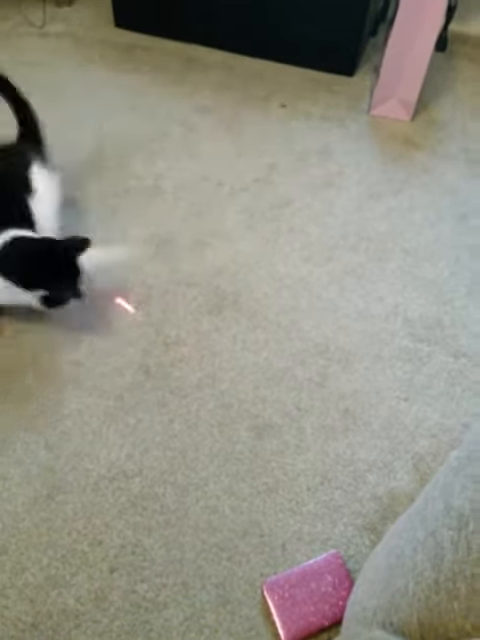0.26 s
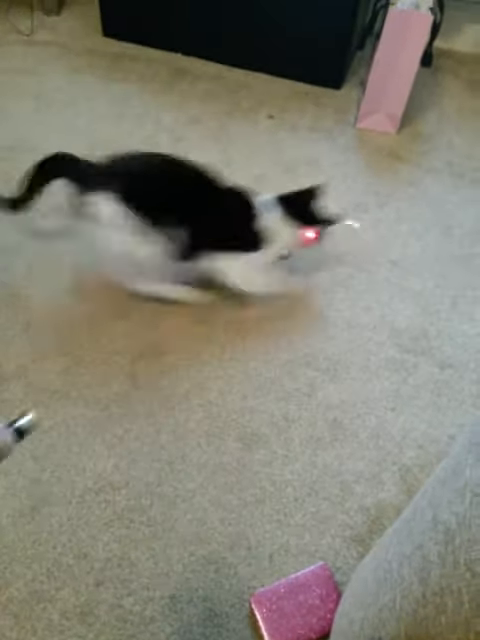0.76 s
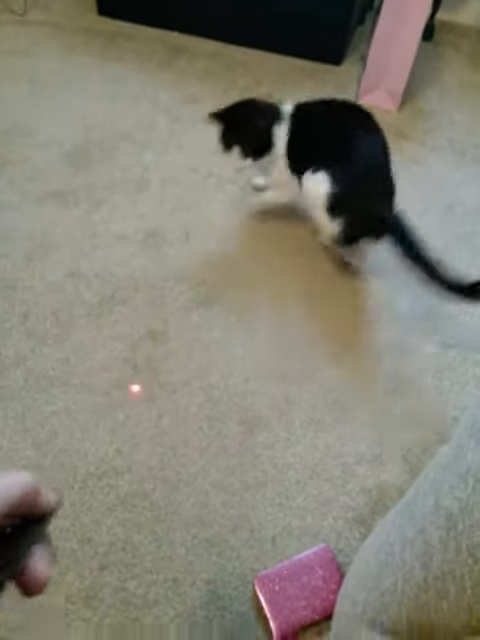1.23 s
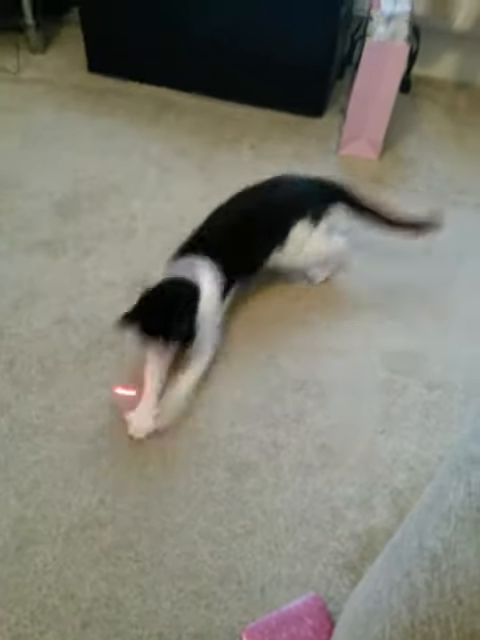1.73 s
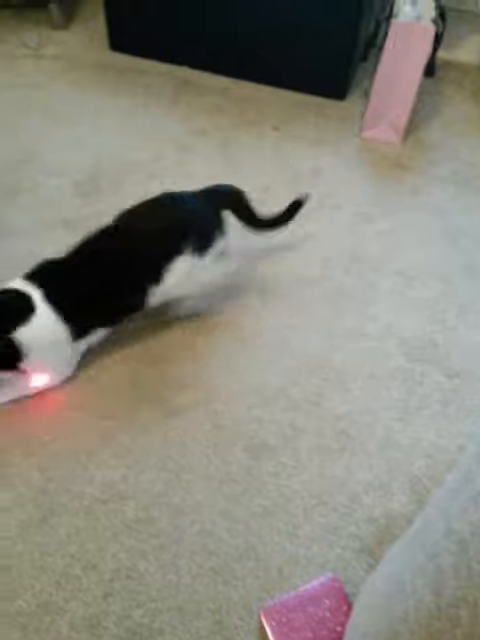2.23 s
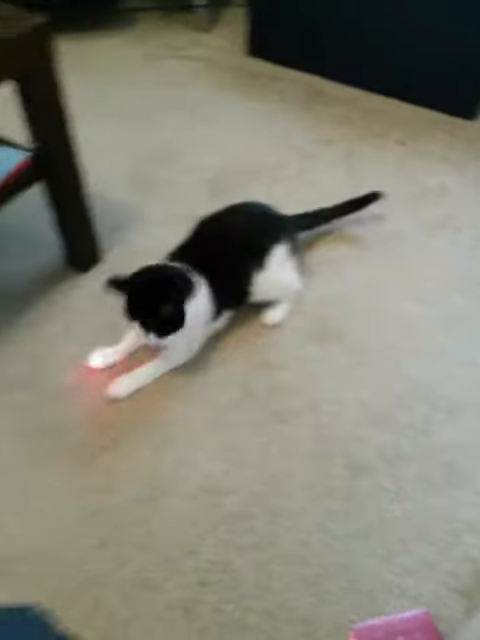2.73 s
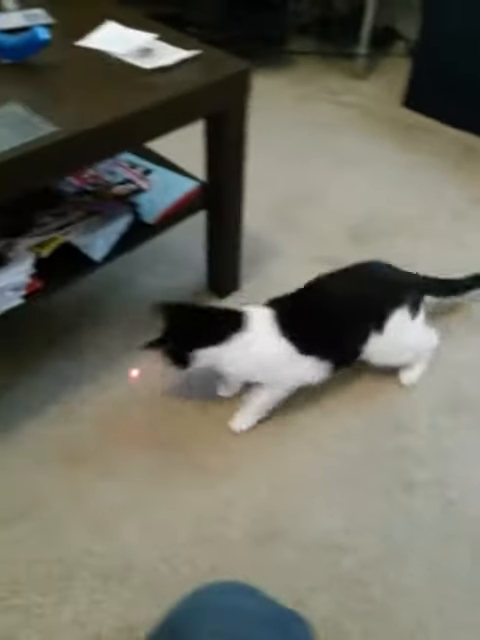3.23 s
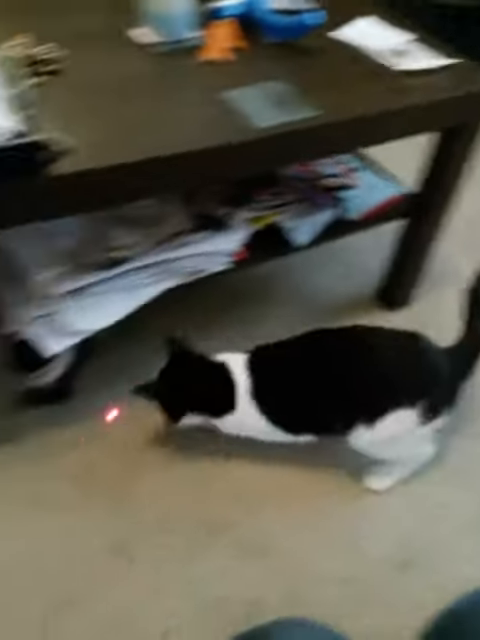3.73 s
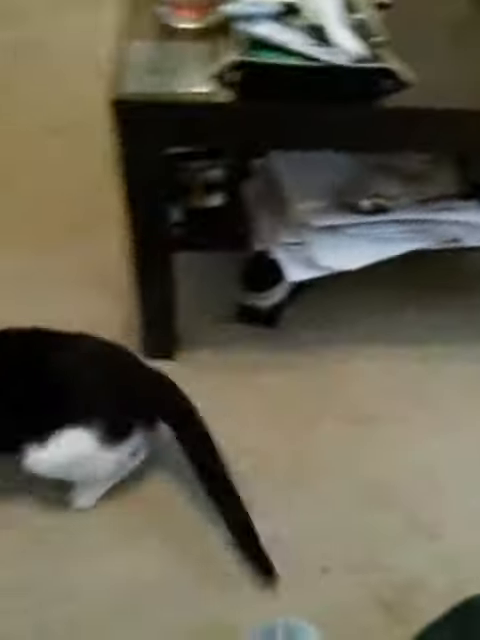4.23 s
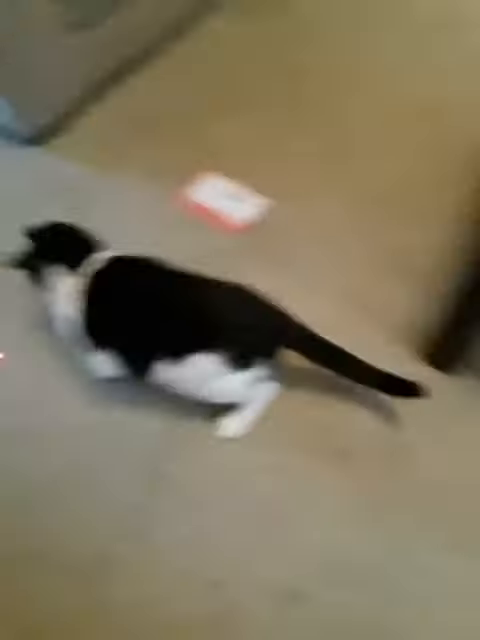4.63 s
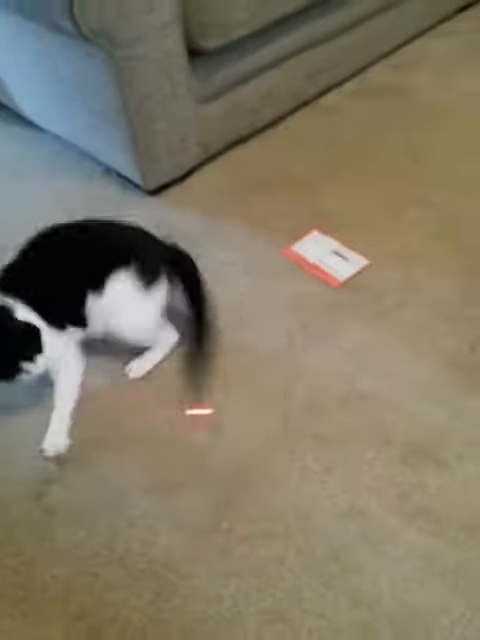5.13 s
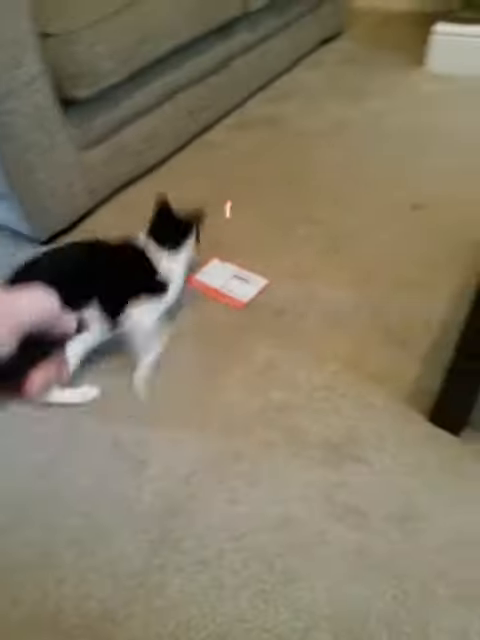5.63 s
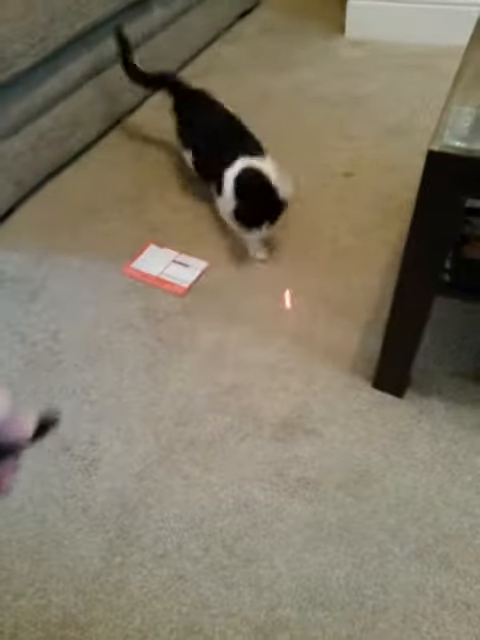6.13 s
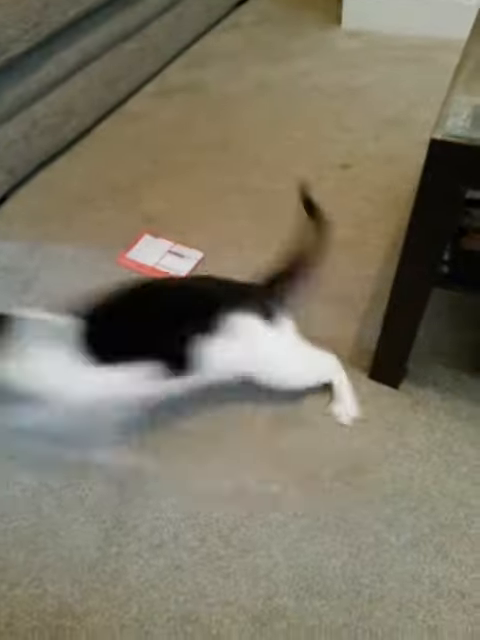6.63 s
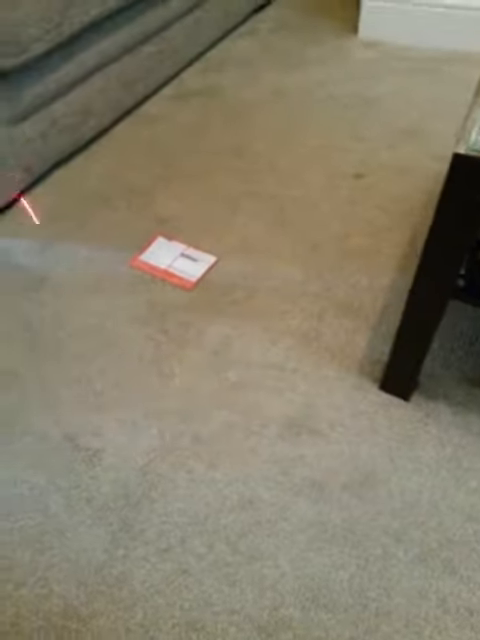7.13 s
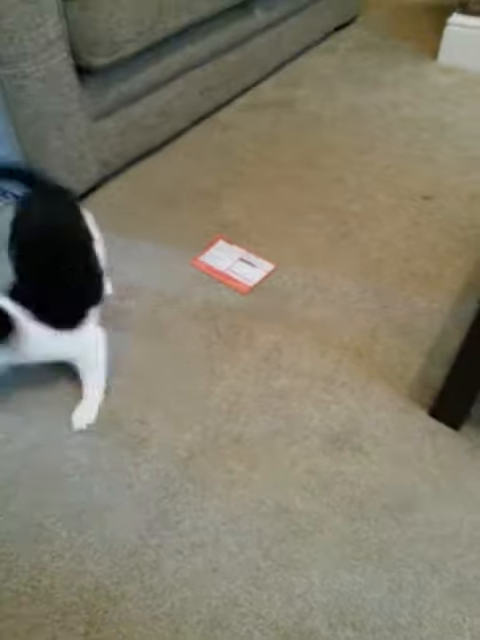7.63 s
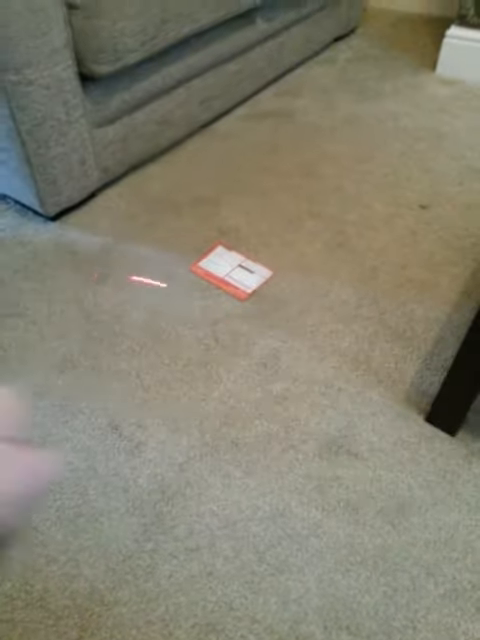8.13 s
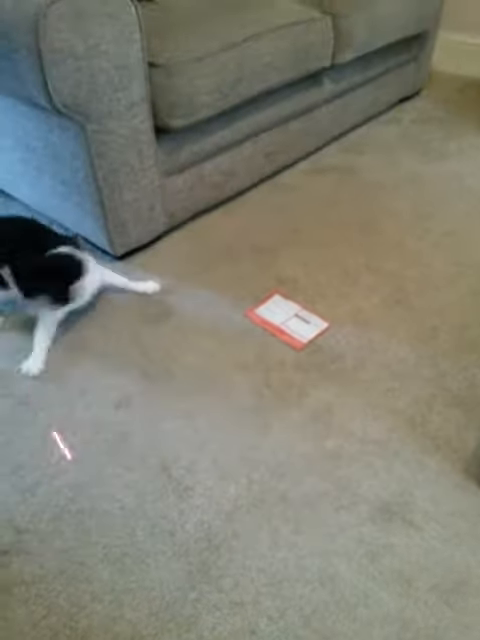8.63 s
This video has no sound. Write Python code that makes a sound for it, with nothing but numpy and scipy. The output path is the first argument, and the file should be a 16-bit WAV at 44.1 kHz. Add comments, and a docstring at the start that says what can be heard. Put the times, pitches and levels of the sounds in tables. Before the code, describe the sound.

A cat scampers, skids and pounces on living-room carpet, claws popping from the pile, while a hand hisses and a small metal chain clinks close on the left.

```python
"""A cat chases a laser dot over living-room carpet while a hand slides with a soft hiss close to the left.
First come paw steps, skids and faint hiss; near 2 s paws thump louder and claws pop out of the pile.
From 2.5 s the hand hisses louder, and near 4 s the pointer's small metal chain clinks in a dense burst.
After 5.5 s paws, pops and skids crowd together to the end. Still air and a short room echo lie behind.
Thuds are pushes of air, pops are filtered kicks, skids and hiss are shaped noise, clinks ring resonances."""
import sys
import numpy as np
from scipy import signal
from scipy.fft import rfft, irfft, next_fast_len
from scipy.io import wavfile
from scipy.ndimage import uniform_filter1d

SR = 44100
rng = np.random.default_rng(int(sys.argv[2]) if len(sys.argv) > 2 else 0)


def file_out(sig):
    """Save sig as 16-bit WAV at sys.argv[1]."""
    # one column per channel
    cols = np.atleast_2d(sig).T
    # limit, then scale
    lim = np.clip(cols, -1, 1)
    pcm = np.round(lim * 32767).astype(np.int16)
    wavfile.write(sys.argv[1], SR, pcm)


N = 391166
TIME = np.arange(N) / SR

# Paw landings, soft and firm, levels before the overall gain:
# (time [s], level [dB], pitch of the thud [Hz])
PAW_LANDINGS = [(0.1236, -38, 560), (0.1445, -45, 470), (0.23, -27.5, 251), (0.3496, -26.5, 384),
                (0.438, -38, 443), (0.8006, -32.5, 400), (0.858, -31, 473), (0.8957, -30, 585),
                (0.981, -27, 330), (1.1083, -30, 406), (1.7083, -31, 172), (1.789, -35.5, 190),
                (1.8187, -27.5, 304), (2.0073, -22, 350), (2.2213, -24, 370), (2.9273, -33.5, 388),
                (4.1007, -32.5, 370), (4.2655, -25.5, 450), (4.3641, -34.5, 417), (4.8953, -37, 503),
                (4.9949, -31, 326), (5.1362, -39, 313), (5.2903, -34.5, 520), (5.4002, -34, 400),
                (5.6062, -17, 354), (5.7137, -29.5, 427), (5.8964, -24.5, 404), (5.9245, -18.5, 460),
                (6.3132, -23, 300), (6.4461, -21.5, 410), (6.8058, -27.5, 235), (6.8583, -33, 450),
                (6.9396, -29, 373), (7.0104, -26.5, 270), (7.4283, -25.5, 318), (7.4533, -25, 330),
                (7.5247, -29.5, 360), (7.7967, -27, 266), (7.9485, -28.5, 298), (8.0355, -29, 300),
                (8.088, -23, 510), (8.1658, -27, 350), (8.5703, -30, 314), (8.6726, -32, 310),
                (8.7128, -25, 296)]
# Claws popping out of carpet loops, levels before the part gains:
# (time [s], thud of the backing [dB], snap of the fibre [dB], pitch of the thud [Hz])
CLAW_POPS = [(0.1747, -28.5, -27, 350), (1.24, -23.5, -27, 336), (2.0685, -12.5, -6, 405),
             (2.1049, -26, -18.5, 500), (2.23, -33, -20, 362), (3.3494, -11.5, -7.5, 338),
             (3.432, -8.5, -5.5, 338), (4.157, -34, -16, 1820), (5.037, -41.5, -37, 900),
             (5.291, -39, -30, 700), (5.7296, -24, -12.5, 560), (5.7491, -24, -14, 595),
             (5.847, -28, -21.5, 353), (5.924, -30.5, -16, 690), (6.0701, -20.5, -9.5, 584),
             (6.2003, -18, -11, 415), (6.4681, -15.5, -15.5, 333), (6.6711, -12, -7, 344),
             (6.7288, -18, -8, 880), (6.7405, -28, -8.5, 900), (6.8436, -32.5, -28, 350),
             (7.0841, -36.5, -36, 350), (7.6593, -17, -12, 362), (7.8112, -24, -14.5, 695),
             (8.3692, -15, -16.5, 348), (8.555, -21.5, -8, 2030)]


def from_db(db):
    """Turn decibels into a gain."""
    return 10 ** (np.asarray(db) / 20)


def rms_one(x):
    """Scale to an average strength (rms) of 1."""
    return x / np.sqrt(np.mean(x ** 2) + 1e-20)


def peak_one(x):
    """Scale to a peak of 1."""
    return x / (np.abs(x).max() + 1e-20)


def at_hz(points, hz):
    """Read a curve of (frequency, value) points on a log-frequency axis."""
    f, value = np.transpose(points)
    return np.interp(np.log(np.maximum(hz, 1)), np.log(f), value)


def cut(x, hz, kind, order=2):
    """Keep only part of the frequency range, with a Butterworth filter."""
    edges = np.clip(hz, 10, SR / 2 - 500)
    return signal.sosfilt(signal.butter(order, edges, kind, fs=SR, output="sos"), x)


def resonance(x, hz, width):
    """Ring at one frequency: a two-pole band-pass, width in Hz, with gain 1 on top."""
    r = np.exp(-np.pi * width / SR)
    top = np.array([1, 0, -1]) * (1 - r * r) / 2
    return signal.lfilter(top, [1, -2 * r * np.cos(2 * np.pi * hz / SR), r * r], x + 1e-18)


def dying(t, t60):
    """Exponential decay that falls by 60 dB in t60 seconds."""
    return np.exp(-np.log(1000) * t / max(t60, 1e-4))


def drift(rate):
    """Random wandering with rms 1, through `rate` new random values per second."""
    knots = rng.standard_normal(N // 10)
    return rms_one(np.interp(TIME * rate, np.arange(len(knots)), knots))


def noise(spectrum):
    """Steady noise of a given colour, rms 1."""
    size = next_fast_len(N)
    hz = np.arange(size // 2 + 1) * SR / size
    white = rfft(rng.standard_normal(size))
    coloured = white * from_db(at_hz(spectrum, hz)) * (hz > 20)
    return rms_one(irfft(coloured, size)[:N])


def diffuse(mid, side):
    """Make a wide stereo field from two unrelated signals; left and right are most alike near 300 Hz."""
    # Likeness of the two channels: (frequency [Hz], correlation [-1 to 1])
    likeness = [(50, 0.47), (130, 0.83), (300, 0.94), (600, 0.23), (1200, 0), (2500, 0), (14000, 0.44)]
    size = next_fast_len(len(mid))
    alike = np.clip(at_hz(likeness, np.arange(size // 2 + 1) * SR / size), -1, 1)
    m = rfft(mid, size) * np.sqrt((1 + alike) / 2)
    s = rfft(side, size) * np.sqrt((1 - alike) / 2)
    return irfft([m + s, m - s], size)[:, :len(mid)]


def panned(db):
    """Left and right gains of constant power; db is how much louder the left is."""
    gains = from_db(np.array([db, -db]).reshape(2, -1) / 2)
    return gains / np.sqrt(np.mean(gains ** 2, axis=0))


def add(out, s, x):
    """Mix a short sound in at time s."""
    i = max(0, round(s * SR))
    n = max(0, min(x.shape[-1], N - i))
    out[..., i:i + n] += x[..., :n]


def paws(motion, gain_db=-1, cycles=0.64, settle_db=-14, settle_t60=0.096,
         floor_db=-22, floor_hz=115, floor_t60=0.15):
    """A soft pad gives one slow push of air; the pile settles and the floor booms faintly."""
    out, t = np.zeros(N), np.arange(SR // 5) / SR
    lead = .008   # seconds from the start of each sound to the middle of its push
    after = np.maximum(t - lead, 0)
    pile, booms = rng.standard_normal(N + len(t)), rng.standard_normal(N)
    for s, db, hz in [*PAW_LANDINGS, *patter(motion)]:
        turn = (t - lead) * hz
        push = -np.cos(2 * np.pi * turn) * np.exp(-(turn / cycles) ** 2)
        # the time, rounded to 0.01 s, picks the stretch of noise
        i = int(round(s, 2) * SR) % N
        rustle = rms_one(cut(pile[i:i + len(t)], [hz * 0.5, hz * 1.65], "band"))
        settle = rustle * dying(after, settle_t60) * (t > lead)
        boom_hz = floor_hz * np.exp(booms[i] * 0.25)
        boom = np.sin(2 * np.pi * boom_hz * after) * dying(after, floor_t60)
        step = push + from_db(settle_db) * settle + from_db(floor_db) * boom
        add(out, s - lead, from_db(db + gain_db) * step)
    return cut(out, 50, "high", order=1)


def patter(motion, vary_db=3.0, vary_pitch=0.36, count=300):
    """More steps fall at random, more often and harder the more the cat moves; rows like PAW_LANDINGS."""
    full_rate, full_db, middle_hz = 14, -31.5, 447   # steps per second and dB, both at full stir; Hz
    when, chance = rng.random((count, 2)).T
    strength, pitch = rng.standard_normal((count, 2)).T
    busy = motion[(when * N).astype(int)] + 1e-6
    level = full_db + 20 * np.log10(busy) + vary_db * strength
    hz = middle_hz * np.exp(vary_pitch * np.clip(pitch, -2, 2))
    rows = np.transpose([when * N / SR, level, hz])
    return rows[chance < full_rate * N / SR / count * np.sqrt(busy)]


def claws(thud_db=2, damping=0.75, dull_hz=1700, snap_t60=0.0035, fray=0.97, tear_db=-25, tear_t60=0.027):
    """The lifted backing slaps down as the loop lets go with a crack; a few more fibres tear after it."""
    out, t = np.zeros(N), np.arange(SR // 8) / SR
    kick = -1. * (t == 0)
    for s, low_db, high_db, hz in CLAW_POPS:
        thud = peak_one(cut(resonance(kick, hz, hz * damping), dull_hz, "low"))
        frayed = fray * rng.standard_normal(len(t)) * dying(t, snap_t60)
        crack = peak_one(cut(kick + frayed, [2000, 13000], "band"))
        spiky = rng.standard_normal(len(t)) ** 3   # cubing leaves a few strong spikes
        tear = rms_one(cut(spiky, [700, 7000], "band", order=1)) * dying(t, tear_t60)
        snap = from_db(high_db) * (crack + from_db(tear_db) * tear)
        add(out, s, from_db(low_db + thud_db) * thud + snap)
    return out


def skids(rasp_db=-1, spread=1.46, grain_db=6, body_db=-10):
    """A braking paw rubs harder and harder, then eases off; tufts flicking under the claws rasp unevenly."""
    # Skids of the paw on the pile, short and long, rasp before its gain:
    # (time of strongest push [s], swell [s], fade [s], rub level [dB], rub pitch [Hz], fibre rasp level [dB])
    braking = [(.186, 0.044, .15, -52, 600, -62), (.98, .15, 0.076, -43, 420, -51.5),
               (1.252, .033, 0.029, -42, 422, -39.5), (2.089, .026, .039, -42, 830, -66),
               (3.45, .012, 0.087, -38, 900, -47), (6.04, .05, 0.089, -27.5, 403, -38.5),
               (6.057, 0.019, 0.033, -35, 620, -35), (6.213, 0.026, 0.06, -34, 375, -35.5),
               (6.546, 0.027, 0.032, -31.5, 456, -61), (6.579, 0.0023, 0.04, -29, 570, -60),
               (6.731, 0.043, 0.055, -45, 870, -36.5), (8.6, 0.093, 0.21, -47, 350, -63)]
    # Colour of the rasp: (frequency [Hz], relative level [dB])
    rasp_colour = [(300, -30), (900, -2.5), (1600, -10.5), (2500, -3), (4500, -13), (7500, 1),
                   (10000, -3.5), (14500, -32)]
    out = np.zeros(N)
    tufts = rms_one(noise(rasp_colour) * from_db(grain_db * np.minimum(drift(500), 1)))
    for s, swell, fade, db, hz, fibre_db in [*braking, *drags()]:
        span = slice(max(0, int((s - swell) * SR)), int((s + fade) * SR))
        push = np.interp(TIME[span], [s - swell, s, s + fade], [0, 1, 0]) ** 0.98
        slips = rng.standard_normal((2, len(push)))
        rub = rms_one(cut(slips[0], [hz / spread, hz * spread], "band"))
        weight = rms_one(cut(slips[1], [110, 320], "band", order=1))
        rubbing = from_db(db) * (rub + from_db(body_db) * weight)
        rasping = from_db(fibre_db + rasp_db) * tufts[span]
        out[span] += push * (rubbing + rasping)
    return out


def drags():
    """After each claw pop the freed paw drags on briefly through the pile; rows like the skids."""
    delay_s, swell_s, fade_s = .014, .012, .06
    rub_db, rasp_db = -26, -30   # against the table's thud level of the pop
    pitch_ratio = 1.36   # rub pitch over thud pitch
    return [(s + delay_s, swell_s, fade_s, db + rub_db, hz * pitch_ratio, db + rasp_db)
            for s, db, _, hz in CLAW_POPS]


def stir():
    """How much the cat's body moves: it swells around every footfall, more for hard ones; top 1."""
    before_s, after_s = 0.079, 0.14   # lead-in and settling
    follows = 0.56   # share of the footfall's dB that the body follows
    t, power = TIME[::100], 0
    for s, db, *_ in [*PAW_LANDINGS, *CLAW_POPS]:
        reach = np.where(t < s, before_s, after_s)
        power = power + from_db(2 * follows * db) * np.exp(-((t - s) / reach) ** 2)
    return peak_one(np.sqrt(np.interp(TIME, t, power)))


def shuffle(motion, gain_db=-46, uneven_db=2):
    """Fur and paws rustle unevenly on the pile as the body moves."""
    # Colour of the rustle: (frequency [Hz], relative level [dB])
    fur_colour = [(40, -24), (80, 4.5), (150, 3), (350, 7.5), (700, 1.5), (1200, -4.5), (2200, -7.5),
                  (4000, -7), (9000, -25)]
    level = from_db(gain_db + uneven_db * drift(60))
    return motion * level * diffuse(noise(fur_colour), noise(fur_colour))


def hand(gain_db=3, grain_db=1.33, waver_db=1.03):
    """Fine friction hisses in strokes that slow and come to rest; a resting hand still hisses faintly."""
    # Strokes, levels before the overall gain:
    # (start [s], length [s], hiss level [dB], left over right [dB], run-up [s])
    strokes = [(0.16, 0.52, -61, 7, .03), (0.749, 0.37, -50.5, 6, 0.074), (1.083, 0.58, -45.5, 10.5, 0.09),
               (1.903, .11, -39.5, 10.5, 0.13), (2.554, 0.21, -29.5, 19.5, 0.099),
               (2.917, .1, -29.5, 16, 0.15), (3.097, 0.29, -34, 15, 0.069), (3.535, .3, -30, 14.5, .07),
               (4.053, 0.093, -40.5, 10, 0.016), (4.637, 0.44, -48.5, 17, 0.16),
               (4.926, 0.2, -49, 11, 0.072), (5.56, 0.19, -38, 9.5, 0.16), (6.004, 0.38, -45.5, 10, 0.3),
               (6.488, 0.27, -44, 7, 0.07), (7.002, 0.078, -49.5, 13, 0.08), (7.39, 0.4, -47, 11, 0.086),
               (8.158, 0.062, -43, 9, 0.21), (8.31, 0.051, -35, 14, 0.087),
               (8.549, 0.14, -32.5, 11.5, 0.098)]
    # Colour of the hiss at the left and right microphone ports: (frequency [Hz], relative level [dB])
    left_colour = [(40, -29.5), (130, -14.5), (400, -23), (1400, -23), (2600, -17.5), (3700, -14),
                   (4600, -15.5), (6000, -5), (7000, 2.5), (7900, -4), (9500, -14.5), (11500, -17.5),
                   (12500, -18.5), (14500, -28)]
    right_colour = [(40, -24), (130, -12), (800, -14.5), (2500, -15), (4500, -12), (6500, -9), (8300, 0.5),
                    (9500, -9.5), (11500, -13), (14500, -19)]
    rest_db, rest_pan_db = -61.5, 6.5
    sag_db_per_s, release_s = 8, 0.11
    t = TIME[::100]
    power = (from_db(rest_db) * panned(rest_pan_db)) ** 2
    for start, length, db, pan, run_up in strokes:
        attack = np.exp(-(np.minimum(t - start, 0) / run_up) ** 2)
        hold = from_db(db - sag_db_per_s * np.clip(t - start, 0, length))
        release = np.exp(-np.maximum(t - start - length, 0) / release_s)
        power = power + (attack * hold * release * panned(pan)) ** 2
    level = np.array([np.interp(TIME, t, np.sqrt(side)) for side in power])
    hiss = np.array([noise(left_colour), noise(right_colour)])
    return hiss * level * from_db(gain_db + grain_db * drift(900) + waver_db * drift(40))


def chain(grain_db=4, tick_db=-11, vary_db=3, detune=0.0028, hold=0.35, tail_db=-17):
    """Each knock is a brief uneven rattle of links, ringing every mode with a strength of its own."""
    # Links knocking, before the loudest are rounded off:
    # (time [s], level [dB], left over right [dB], rattle length [s])
    knocks = [(1.701, -28, -2, 0.053), (1.743, -31.5, -2, 0.047), (1.778, -30, 3, 0.042),
              (1.817, -30, 6, 0.029), (2.005, -26.5, 7, 0.021), (2.925, -13.5, 19, 0.028),
              (3.602, -13, 20, 0.017), (3.699, -16.5, 19, 0.022), (3.726, -17, 11, .037),
              (3.783, -17.5, 16, 0.028), (3.818, -16, 14, 0.049), (3.8347, -13.5, 15, 0.025),
              (3.849, -13, 19, 0.035), (3.8654, -16, 13, 0.021), (3.891, -8, 17, 0.12),
              (3.924, -35, 8, 0.067), (3.9585, -11.5, 7, 0.027), (3.981, -7, 21, 0.018),
              (3.989, -13.5, 11, 0.11), (4.09, -14.5, 15, 0.053), (4.105, -25, 9, 0.04),
              (4.119, -21, 14, 0.052), (4.155, -21, 18, 0.027), (4.225, -34.5, 17, 0.016),
              (4.532, -23, 12, 0.028), (8.3365, -16, 20, 0.031), (8.825, -31.5, 12, .022)]
    # Ringing of the links: (frequency [Hz], width [Hz], relative level before chance variation [dB])
    modes = [(3700, 1000, 2), (6200, 170, 9), (7400, 110, -3), (7200, 87, -5), (7730, 520, 29),
             (10400, 43, 1), (11500, 300, 4), (10580, 780, 10), (12800, 530, -32), (13400, 310, -19)]
    out, t = np.zeros((2, N)), np.arange(SR // 10) / SR
    swinging = jingle(3.8, 4.05, -21.5, count=10)   # the chain swings and lesser knocks crowd together
    stray = jingle(4.2, 6.8, -33.5, count=6)   # small knocks while the pointer is held
    for s, db, pan, length in [*knocks, *swinging, *stray]:
        contacts = np.minimum(rng.standard_normal(len(t)), 2)
        contacts[0] = 2   # the first contact is the hardest
        clumps = from_db(grain_db * np.repeat(contacts, 20)[:len(t)])
        rattle = np.exp(-(t / (hold * length)) ** 2) + from_db(tail_db) * dying(t, 2 * length)
        touches = rng.standard_normal((2, len(t))) * clumps * rattle
        clink = from_db(tick_db) * touches
        for hz, width, mode_db in modes:
            strength = from_db(mode_db + rng.normal(0, vary_db))
            clink = clink + strength * resonance(touches, hz * (1 + rng.normal(0, detune)), width)
        clink = cut(clink, 2130, "high", order=6)
        # loudest 3 ms of each channel
        loudest = np.sqrt(uniform_filter1d(clink ** 2, size=130, axis=1).max(axis=1, keepdims=True))
        add(out, s, from_db(db) * panned(pan) * clink / loudest)
    ceiling = .62
    rounded = ceiling * np.tanh(out / ceiling)   # the loudest knocks are rounded off
    return cut(rounded, 2400, "high", order=3)


def jingle(first_s, last_s, level_db, count, vary_db=2, pan_db=21, length_s=0.016):
    """Lesser knocks of the links, unevenly spaced over a stretch of time; rows like the chain's knocks."""
    times = first_s + (last_s - first_s) * (np.arange(count) + rng.random(count)) / count
    levels = level_db + vary_db * rng.standard_normal(count)
    return [(s, db, pan_db, length_s) for s, db in zip(times, levels)]


def spaced(x, lag_s=.00004):
    """The cat is off to one side, so its sound reaches the left port a little before the right."""
    return np.array([x, np.interp(TIME - lag_s, TIME, x)])


def living_room(x, wet_db=-5, first_echo_s=.009, early_db=4, early_t60=0.075):
    """Dense echoes off the furniture, then a short tail that dies sooner in the treble."""
    # Colour of the echo: (frequency [Hz], relative level [dB])
    echo_colour = [(60, -1.5), (150, -1.5), (330, 3.5), (700, -5), (1500, 5), (4000, -0.5), (12000, -10.5)]
    # Time the tail takes to fall by 60 dB: (frequency [Hz], time [s])
    echo_t60 = [(60, 1), (350, 0.25), (1500, 0.36), (12000, 0.065)]
    t = np.arange(SR // 2) / SR
    edges = np.geomspace(45, 16000, 13)
    white, tail = rng.standard_normal((2, 2, len(t))), 0
    for k, (low, high) in enumerate(zip(edges, edges[1:])):
        hz = np.sqrt(low * high)
        fade = dying(t, at_hz(echo_t60, hz)) + from_db(early_db) * dying(t, early_t60)
        fade = fade / np.sqrt(np.sum(fade ** 2))
        # neighbouring bands use unrelated noise
        tail = tail + cut(white[k % 2], [low, high], "band") * from_db(at_hz(echo_colour, hz)) * fade
    out = np.zeros((2, N))
    add(out, first_echo_s, from_db(wet_db) * signal.fftconvolve(x[None], diffuse(*tail), axes=1))
    return out


def ports(x, left_hz=7000, right_hz=8300, width=1400, left_db=6, right_db=0):
    """The small cavity before each microphone rings in the treble."""
    left = from_db(left_db) * resonance(x[0], left_hz, width)
    right = from_db(right_db) * resonance(x[1], right_hz, width)
    return x + np.array([left, right])


def still_air(level_db=-62):
    """Steady faint noise of the air, spread between left and right."""
    # Colour of the air: (frequency [Hz], relative level [dB])
    air_colour = [(25, -4), (60, 4), (150, -4), (350, 9), (900, 0), (2000, 4), (4500, -45), (7000, -26),
                  (10000, -10), (14000, -21)]
    return from_db(level_db) * diffuse(noise(air_colour), noise(air_colour))


def scene():
    """The cat in the room, hand and chain close by, still air behind."""
    motion = stir()
    cat = paws(motion) + claws() + skids()
    cat_in_room = ports(spaced(cat) + living_room(cat))
    return cat_in_room + shuffle(motion) + hand() + chain() + still_air()


def record(dry, cutoff_hz=14600):
    """Peaks beyond full scale clip; then the top of the treble is cut steeply."""
    steep = signal.ellip(10, .3, 80, cutoff_hz, fs=SR, output="sos")
    return signal.sosfilt(steep, np.clip(dry, -1, 1))


dry = scene()
out = record(dry)
file_out(out)
```